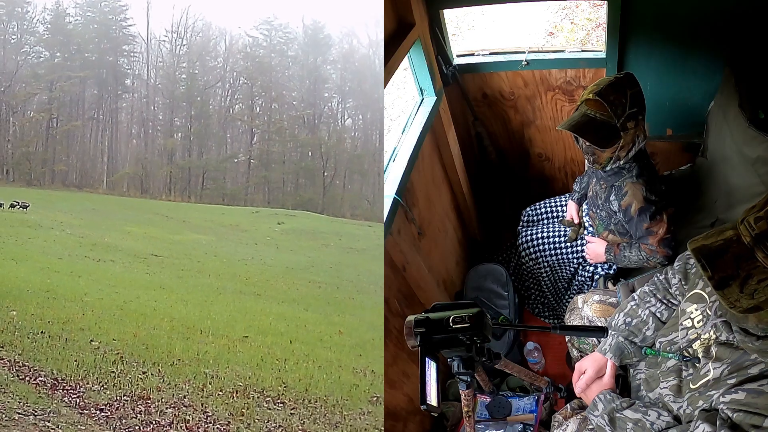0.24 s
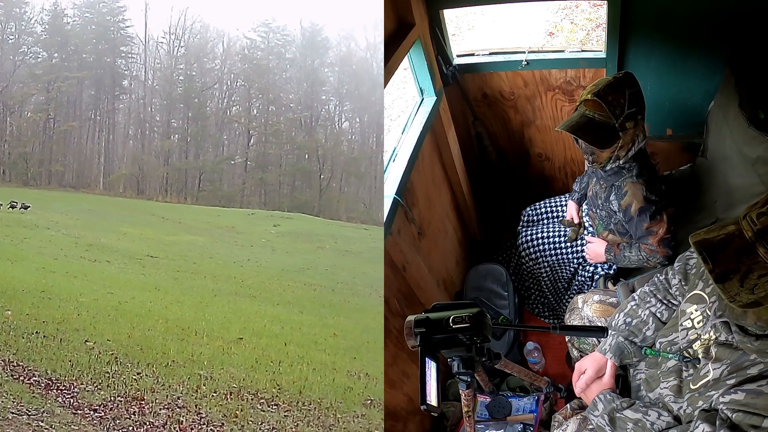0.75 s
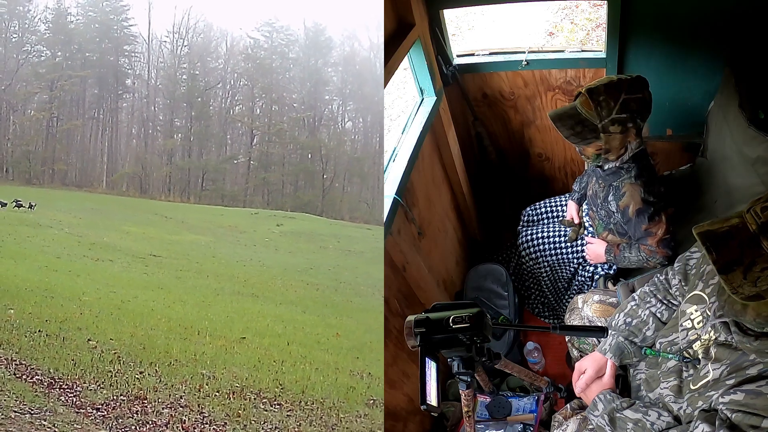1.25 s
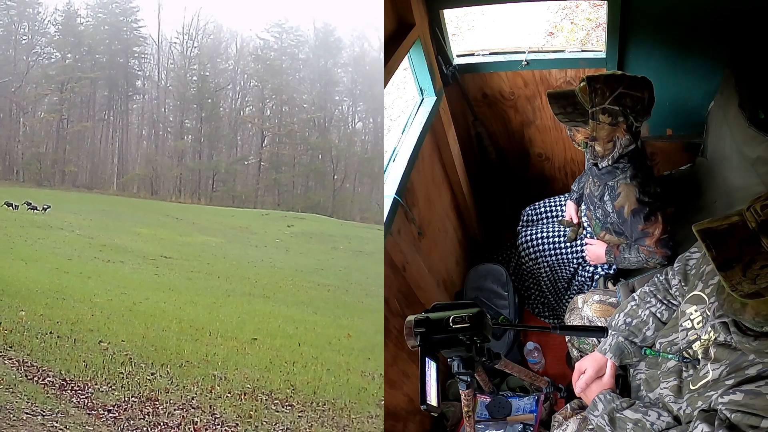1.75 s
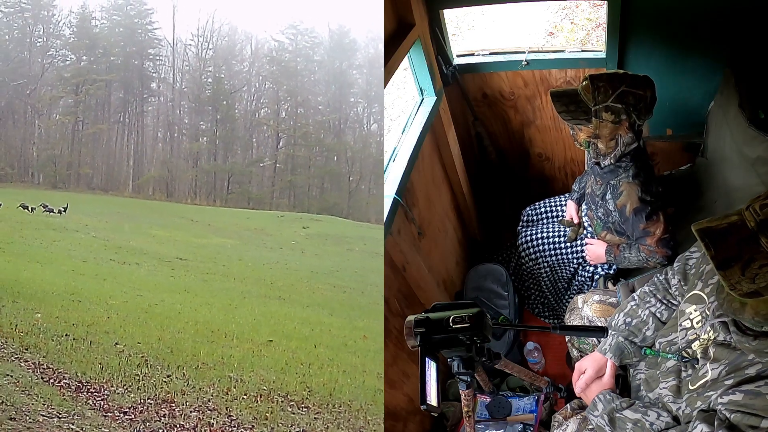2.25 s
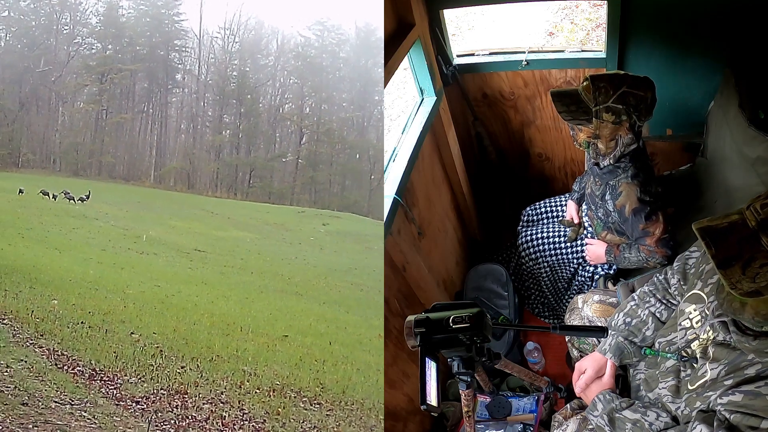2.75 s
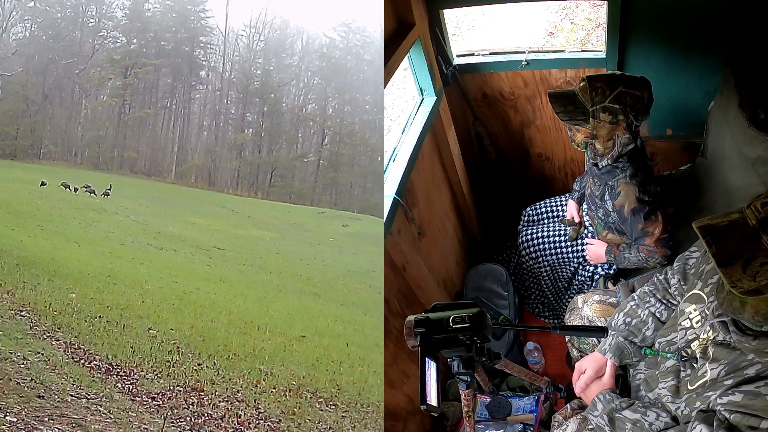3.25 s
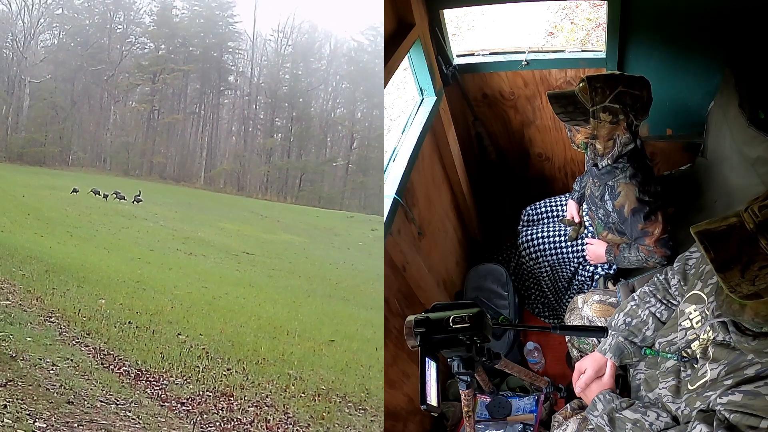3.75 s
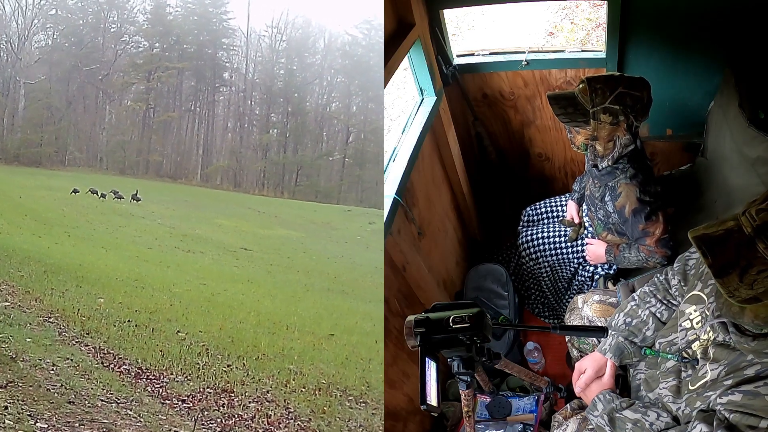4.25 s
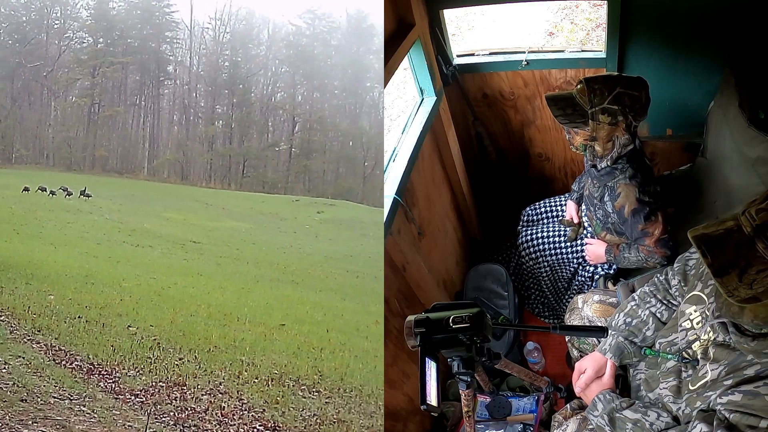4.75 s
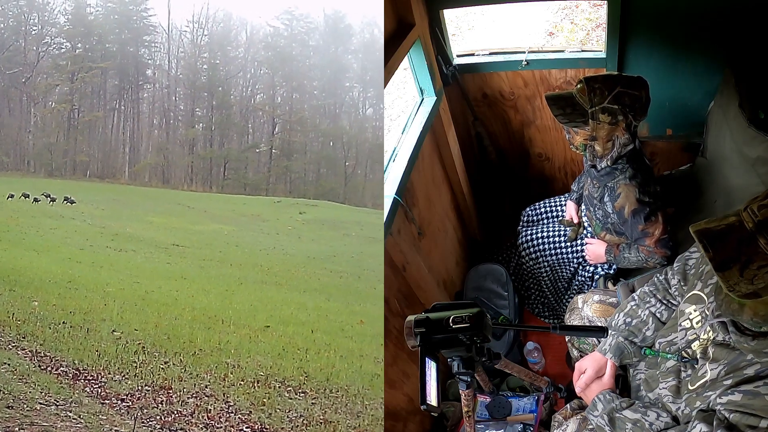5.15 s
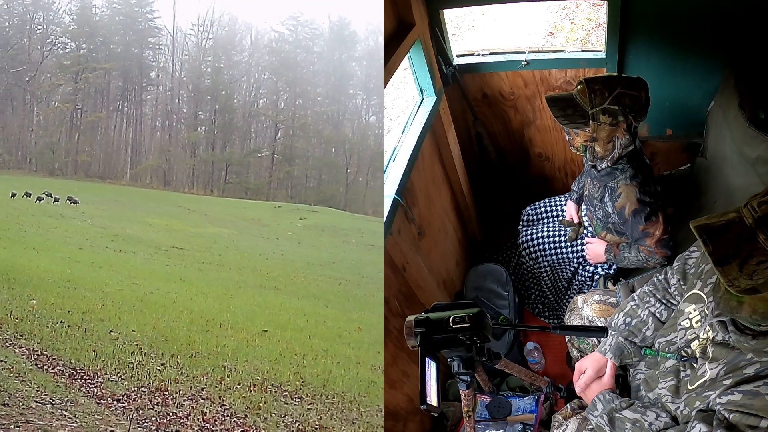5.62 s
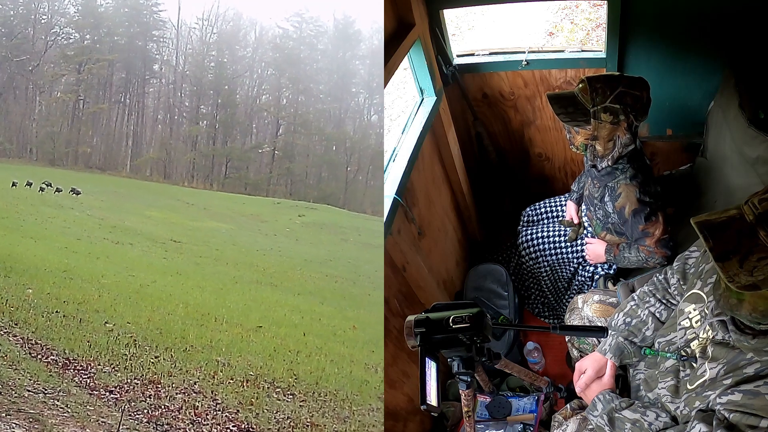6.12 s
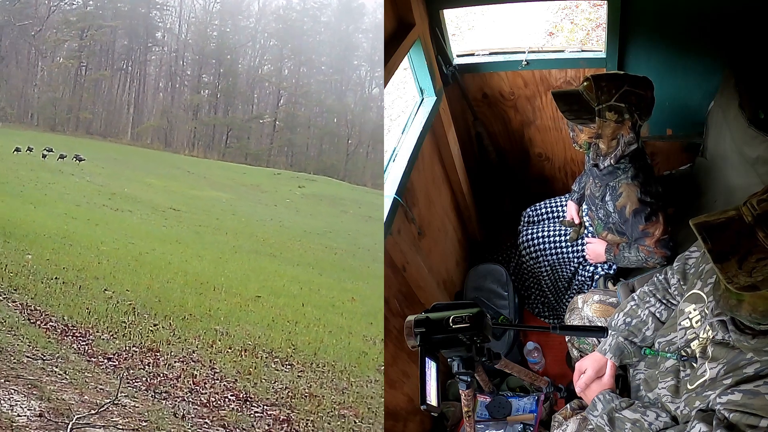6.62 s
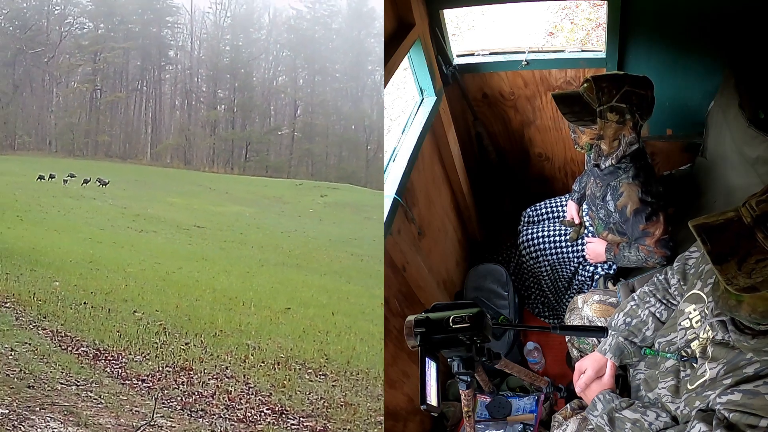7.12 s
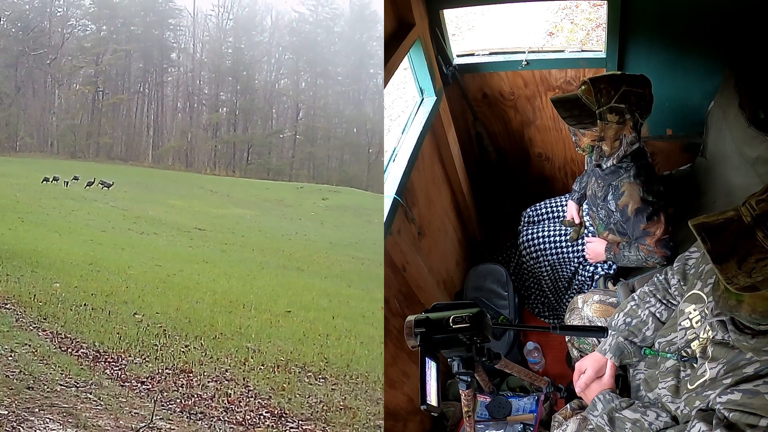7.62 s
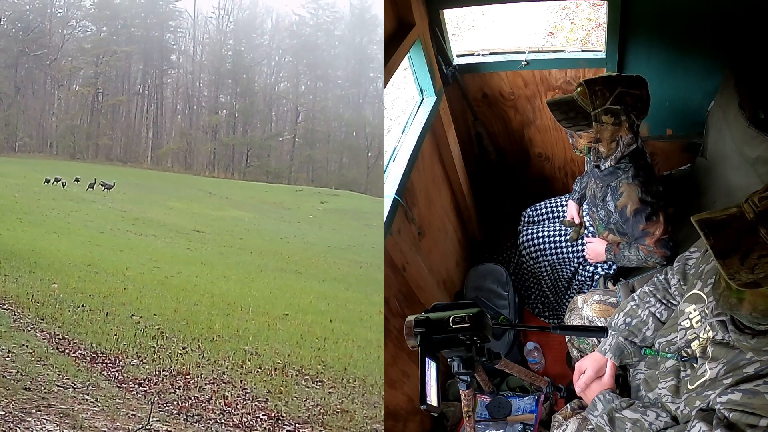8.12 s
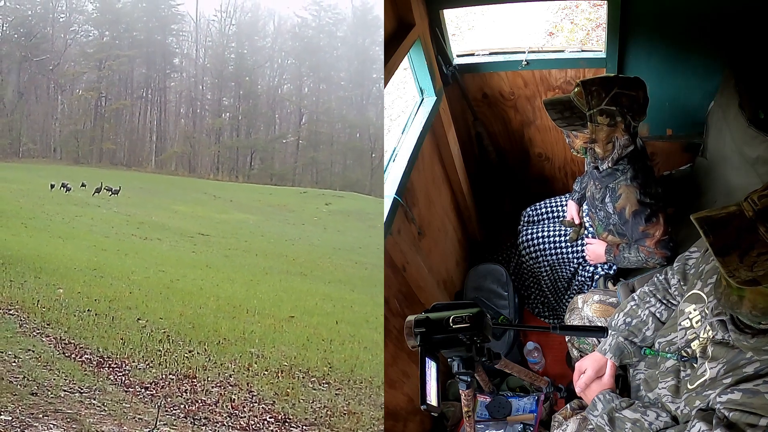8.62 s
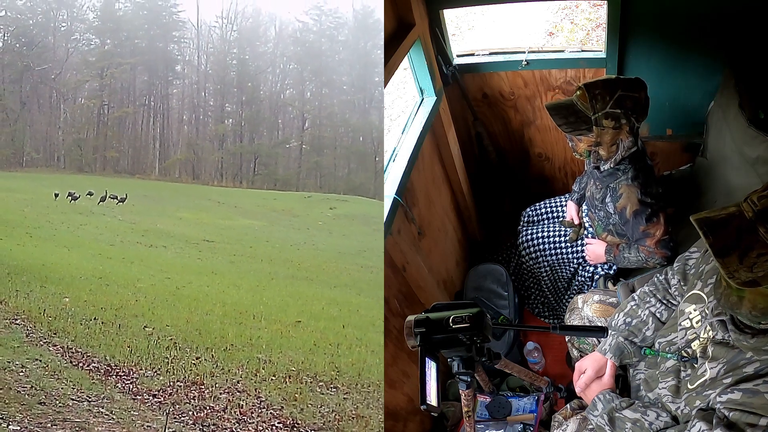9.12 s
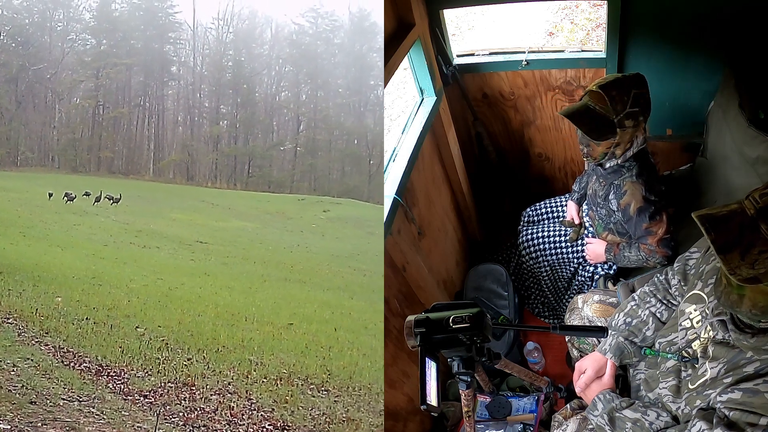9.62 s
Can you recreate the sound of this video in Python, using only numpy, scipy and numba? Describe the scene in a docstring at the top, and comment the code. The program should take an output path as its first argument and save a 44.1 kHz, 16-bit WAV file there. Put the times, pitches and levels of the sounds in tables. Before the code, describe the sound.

Light raindrops tap irregularly on a small wooden hut's roof, heard from inside over a faint hiss of rain and low wind.

```python
"""A low rumble of wind and the hiss of light rain on a field, heard from inside a small hut.
Small drops patter at random on the plywood roof, and fine spray ticks at the windows.
Each big drop cracks on the roof sheet, rattles briefly round the hut and sets the panels booming,
the low notes swelling last. A two-sided microphone hears a slightly different mix left and right."""
import sys
import numpy as np
from scipy import signal
from scipy.io import wavfile
from scipy.ndimage import uniform_filter1d
from numba import njit

SR = 44100
rng = np.random.default_rng(int(sys.argv[2]) if len(sys.argv) > 2 else 0)


def wav_out(sig):
    """Save sig, one row per channel (or a flat mono array), as 16-bit PCM at SR to the path in sys.argv[1]."""
    wavfile.write(sys.argv[1], SR, np.round(np.clip(np.atleast_2d(sig).T, -1, 1) * 32767).astype(np.int16))


N = 435250
WINDOW_LEAN_DB = -1  # a "lean" is the left level minus the right level
OPPOSITE = np.array([[1], [-1]])  # adds on the left, takes away on the right


def undb(db):
    """Turn decibels into a number to multiply by."""
    return 10 ** (np.asarray(db) / 20)


def along(table, hz):
    """Read between rows of pitch and value, with octaves evenly spaced."""
    pitches, values = np.transpose(table)
    return np.interp(np.log(hz), np.log(pitches), values)


@njit
def bandpass(x, hz, width_hz):
    """Let through the sound near hz and weaken the rest."""
    y, band, low = np.empty(len(x)), 0., 0.
    tuning, damping = np.tan(np.pi * hz / SR), width_hz / hz
    for i in range(len(x)):
        now = (band + tuning * (x[i] - low)) / (1 + tuning * (tuning + damping))
        band = 2 * now - band
        low += 2 * tuning * now
        y[i] = damping * now
    return y


def narrow(x, hz, width_hz, passes):
    """Band-pass several times for steeper edges."""
    for _ in range(passes):
        x = bandpass(x, hz, width_hz)
    return x


def wander(per_second):
    """A smooth random curve that strays about 1 either side of zero."""
    hold = int(SR / per_second)
    steps = np.repeat(rng.standard_normal(N // hold + 1), hold)
    return uniform_filter1d(uniform_filter1d(steps, hold), hold)[:N] * np.sqrt(2)


def add(out, start_s, sound, lean_db):
    """Mix a stereo sound into out; a positive lean moves it left."""
    i = int(start_s * SR)
    out[:, i:i + sound.shape[1]] += (sound * undb(OPPOSITE * lean_db / 2))[:, :N - i]


def noise_bands(spectrum, low_hz, high_hz, flicker_db, shared_db, per_second):
    """Noise bands, three to the octave, that flicker alone and together; average (rms) level 1."""
    # Each row: pitch in Hz, how alike left and right are from 0 to 1.
    likeness = [(30, 0.86), (300, 0.31), (1000, 0.86), (3000, 0.33), (8000, 0)]
    # Each row: pitch in Hz, lean to the left in dB.
    leans = [(100, -0.9), (1500, 2), (4000, 4), (8000, -1), (13000, -2)]
    out, shared = 0, wander(per_second)
    for hz in 2 ** np.arange(np.log2(low_hz), np.log2(high_hz), 1 / 3):
        middle, side = (narrow(rng.standard_normal(N), hz, hz / 3, passes=2) for _ in range(2))
        alike = along(likeness, hz)
        pair = np.sqrt(1 + alike) * middle + np.sqrt(1 - alike) * side * OPPOSITE
        steady_db = along(spectrum, hz) + along(leans, hz) / 2 * OPPOSITE
        out = out + pair * undb(steady_db + flicker_db * wander(per_second) + shared_db * shared)
    return out / np.sqrt(np.mean(out ** 2))


def wind_rumble(wind_db):
    """Wind makes a deep noise that swells with each gust."""
    # The tone of the rumble. Each row: pitch in Hz, relative level in dB.
    spectrum = [(12, -17), (20, 6), (30, -2), (48, -2.5), (62, -35), (80, -33)]
    return undb(wind_db) * noise_bands(spectrum, 12, 80, flicker_db=1, shared_db=1.5, per_second=5)


def field_hiss(wind_db, db=-59, db_per_wind_db=0.076):
    """Rain on the field blurs into a hiss, a little louder in gusts."""
    # The tone of the hiss. Each row: pitch in Hz, relative level in dB.
    spectrum = [(41, -30), (70, -11), (103, -10), (177, 6.5), (284, -3.5), (478, -7.5), (785, -29.5),
                (1080, -8), (1380, -5), (1810, -14), (2660, -8.5), (4680, -13), (7690, -18), (12600, -34),
                (15500, -57)]
    gain = undb(db + db_per_wind_db * (wind_db - wind_db.mean()))
    return gain * noise_bands(spectrum, 75, 15500, flicker_db=1.2, shared_db=.4, per_second=20)


def roof_tap(hz, splash_db, crack_db, wood_db=-8, rattle_db=-8, apart=.95):
    """A drop's sharp push cracks near hz, rings the wood, rattles round the hut and splashes."""
    t = np.arange(int(SR / 10)) / SR
    wood_s, rattle_s, splash_s = .05, .095, .06  # 1000 ** (-t / s) fades by 60 dB in s seconds
    noise = rng.standard_normal((5, len(t)))
    sides = apart * noise[3:]  # makes left and right differ
    give = np.clip(1500 / hz, .5, 1)  # stiffer spots crack higher and ring shorter
    push = 3 * np.exp(-t / .0001) + 1.2 * noise[0] * np.exp(-t / .0012)  # the drop spreads as it lands
    crack = bandpass(narrow(push, hz, 2 * hz, passes=3), hz, hz)
    # every spot has its own five short notes, and each side hears its own mix
    detune, left, right = rng.standard_normal((3, 5, 1))
    note_hz = np.maximum(hz * np.exp(.2 * detune + .05), 1120)
    notes = np.sin(2 * np.pi * note_hz * t) * 1000 ** (-t / wood_s / give)
    wood = np.array([((1 + apart * mix) * notes).mean(axis=0) for mix in (left, right)])
    rattle = give * (noise[1] + sides) * (1 - np.exp(-t / .002)) * 1000 ** (-t / rattle_s / give)
    rattle = [narrow(side, 1.15 * hz, 1.3 * hz, passes=2) for side in rattle]
    rattle = np.array([bandpass(side, hz, 2.5 * hz) for side in rattle])
    splash = (noise[2] + sides) * (1 - np.exp(-t / .00029)) * 1000 ** (-t / splash_s)
    splash = np.array([narrow(side, 4400., 4900., passes=3) for side in splash])
    body = undb(crack_db) * crack + undb(wood_db) * wood + undb(rattle_db) * rattle
    return body / np.abs(body).max() + undb(splash_db) * splash / np.abs(splash).max()


def panel_ring(notes, scatter_db=2.5, rise_cycles=0.6, side_db=-14):
    """A struck panel rings; slow bass waves in the wood make its low notes swell late."""
    t = np.arange(int(SR / 4)) / SR
    hz, db, fade_s = np.transpose(notes)[:, :, None]
    louder, detune, phase, lean = rng.standard_normal((4, len(notes), 1))
    damping = np.exp(0.28 * abs(rng.standard_normal(hz.shape)))  # each spot damps differently
    swell = (1 - np.exp(-t * hz / rise_cycles)) * 1000 ** (-t / fade_s * damping)
    waves = np.sin(2 * np.pi * hz * (1 + 0.07 * detune) * t + 2 * phase)
    tones = undb(db + scatter_db * louder) * swell * waves
    middle, side = tones.sum(axis=0), (lean * tones).sum(axis=0)
    return (middle + undb(side_db) * side * OPPOSITE) / np.abs(middle).max()


def panel_boom(wall_db, knock_db, dull_db):
    """Walls boom and the roof knocks; a soft blow loses more of the high notes (dull_db per octave)."""
    # The notes the panels ring at. Each row: pitch in Hz, relative level in dB, longest time
    # in seconds to fade by 60 dB.
    walls = [(74, -4.5, 0.22), (98.4, -9, 0.31), (114.2, -2, 0.2)]
    roof = [(155.9, -8, 0.31), (175.7, 0.5, 0.25), (218, -4.5, 0.25), (266.4, -9.5, 0.23),
            (307, -4.5, 0.17), (359.3, -14.5, 0.2), (386, -7, 0.15), (452, -3, 0.11), (552, -7, 0.09)]
    dull_db += 2.5 * rng.standard_normal()  # each spot gives differently
    dulled_roof = [(hz, db - dull_db * np.log2(hz / roof[0][0]), fade_s) for hz, db, fade_s in roof]
    return undb(wall_db) * panel_ring(walls) + undb(knock_db) * panel_ring(dulled_roof)


def patter(count=700, db=-56, size_db=5, typical_hz=2200):
    """Small drops hit the roof at random moments, each on its own spot; a few are larger."""
    out = np.zeros((2, N))
    when, size, spots = rng.random(count), rng.exponential(size=count), rng.standard_normal((count, 3))
    flurry_db = 1.3 * wander(4)[(when * (N - 1)).astype(int)]  # louder and softer spells
    gains = undb(db + size_db * np.minimum(size, 1.6) + flurry_db)
    for k, (start_s, gain, (spot, wetness, lean)) in enumerate(zip(when * N / SR, gains, spots)):
        hz = np.clip(typical_hz * np.exp(0.39 * spot), 1000., 4200.)
        tap = roof_tap(hz, splash_db=-14 + 5 * wetness, crack_db=-13)
        add(out, start_s, gain * tap, lean_db=3 + 6 * lean)
        if k % 8 == 0:  # one in eight lands where the panels give
            boom = panel_boom(wall_db=-8 + 4 * spot, knock_db=-4, dull_db=6.5)
            add(out, start_s, gain * boom, lean_db=1.5)
    return out


def splash_tick(hz, cycles=22, base_fade_s=.008):
    """A tiny splash is a puff of noise near hz, longer the lower it is."""
    t = np.arange(int(SR / 40)) / SR
    noise = rng.standard_normal((3, len(t)))
    shape = (1 - np.exp(-t / .001)) * 1000 ** (-t / (base_fade_s + cycles / hz))
    puff = (noise[0] / 2 + noise[1:]) * shape
    sound = np.array([bandpass(narrow(side, hz, hz, passes=2), hz, 2 * hz) for side in puff])
    return sound / np.abs(sound).max()


def window_spray(wind_db, count=900, db=-63, size_db=3, typical_hz=5500, db_per_wind_db=0.37):
    """Fine splashes hit the windows in flurries, harder when the wind rises."""
    out = np.zeros((2, N))
    flurry_db = 4 * wander(2.89) + db_per_wind_db * (wind_db - wind_db.mean())
    splashes = np.c_[rng.random(count), rng.exponential(size=count), rng.standard_normal((count, 2))]
    for when, size, fineness, lean in splashes:
        gain = undb(db + size_db * (min(size, 2) - fineness) + flurry_db[int(when * (N - 1))])
        hz = np.clip(typical_hz * np.exp(0.25 * fineness), 2500., 9000.)
        add(out, when * N / SR, gain * splash_tick(hz), WINDOW_LEAN_DB + 4 * lean)
    return out


def big_drops(boom_lean_db=2.5):
    """The drops that stand out crack, thud or splash on the hut; most land to the left."""
    # Hard hits on the roof. Each row: start in seconds, tap level in dB, pitch in Hz,
    # splash in dB above the tap, roof knock in dB, wall boom in dB above the knock.
    drops = [(0.3039, -32, 1226, -36, -35.5, -12.5), (0.447, -23.5, 1537, -46, -32, -2),
             (0.9471, -37, 1400, -13, -44, -2.5), (1.291, -31.5, 1613, -11, -40.5, -4),
             (1.5375, -24, 2070, -3, -30.5, -12.5), (1.6426, -20, 1530, -50, -28.5, -15),
             (1.6926, -45, 1350, -26, -42, -8), (1.7858, -31.5, 1343, -9.5, -37, -27),
             (1.8213, -37, 2330, -14, -48, -13), (1.838, -39, 2860, -3, -60, -4),
             (2.2924, -27, 1860, -48, -37, -1), (2.696, -39, 2500, -15, -69, -2),
             (2.766, -32, 1227, -38, -38, -11.5), (2.86, -39.5, 1730, -15, -38.5, -19),
             (3.0858, -38.5, 1570, -15, -58.5, -15), (3.3669, -33.5, 2160, -5, -45, -7),
             (3.397, -33.5, 1370, -13, -42.5, -15), (3.419, -34, 1490, -17, -57, 11),
             (3.845, -37.5, 1180, -8.5, -41, -7), (3.9197, -36.5, 1840, -28, -54, -18),
             (4.3029, -31.5, 1100, -17, -40, -6.5), (4.575, -35, 1640, -13, -77, -10),
             (4.8816, -36, 1330, -29, -50.5, 0), (5.1599, -25.5, 2380, -76, -37.5, -6.5),
             (5.467, -37.5, 1420, -5, -51, -7), (5.656, -35.5, 2800, -20, -49, -14),
             (5.7329, -32, 1374, -21, -36, 2), (6.1656, -24.5, 1427, -44, -36.5, -9),
             (6.2592, -33, 1610, -10, -50, -1), (6.317, -35, 1780, -19, -45, -23),
             (7.3215, -39.5, 1760, -25, -67, -1), (7.465, -32, 1990, -12, -41, -34),
             (7.6177, -34.5, 1280, -15, -39.5, -8.5), (7.6725, -35.5, 1187, -18, -37, -14),
             (7.8964, -39, 1520, -10, -49, -2), (7.962, -28, 1680, -13, -31.5, -28),
             (8.1614, -31.5, 1094, -23, -30, -5.5), (8.4602, -29, 1140, -39, -34, 6),
             (8.4897, -35.5, 1370, -15, -39, -7), (8.636, -26, 1420, -46, -43, -0.5),
             (8.8949, -38, 2580, -34, -58, 1), (9.157, -38.5, 1410, -30, -43.5, -9),
             (9.2546, -39.5, 1450, -10, -51, -4), (9.3714, -33.5, 1190, -15, -29.5, -6),
             (9.83, -36.5, 1630, -13, -42, -7)]
    # Soft hits with no crack. Each row: start in seconds, roof knock in dB, wall boom in dB above it.
    thuds = [(1.347, -40.5, -10), (1.919, -45.5, -6), (2.279, -40, -6), (2.579, -44, -13),
             (3.76, -35.5, -1), (4.384, -44, 9.5), (4.679, -34.5, -9.5), (6.365, -43.5, -3),
             (7.209, -44.5, -27), (7.577, -42.5, -30), (7.93, -36, -39), (8.009, -37.5, -4)]
    # Thin splashes on sills and walls. Each row: start in seconds, level in dB, pitch in Hz.
    ticks = [(0.656, -42, 2560), (0.98, -44, 1200), (3.365, -45, 8650), (3.842, -43, 8550),
             (4.829, -43, 4470), (5.194, -44, 7350), (5.344, -42, 2300), (5.444, -41, 2490),
             (5.851, -42, 2110), (6.299, -40.5, 3640), (6.888, -42.5, 1340), (7.058, -42, 2730),
             (7.12, -43, 4000), (7.288, -49, 8900), (7.369, -37.5, 7900), (7.99, -42, 1490),
             (8.003, -38.5, 1260), (9.255, -47, 7700)]
    out = np.zeros((2, N))
    leans_db = rng.normal(4, 1.5, len(drops))
    for (start_s, db, hz, splash_db, knock_db, above_db), lean_db in zip(drops, leans_db):
        crack_db = -6 + .45 * (db + 24)  # lighter drops splat rather than crack
        add(out, start_s, undb(db) * roof_tap(float(hz), splash_db, crack_db), lean_db)
        add(out, start_s, panel_boom(knock_db + above_db, knock_db, dull_db=-0.5), boom_lean_db)
    for start_s, knock_db, above_db in thuds:
        add(out, start_s, panel_boom(knock_db + above_db, knock_db, dull_db=5.5), boom_lean_db)
    for start_s, db, hz in ticks:
        add(out, start_s, undb(db) * splash_tick(float(hz)), WINDOW_LEAN_DB)
    return out


def scene():
    """Wind and steady rain outside, with drops landing on the hut."""
    # How the wind rises and falls. Each row: time in seconds, rumble level in dB.
    gusts = [(0, -55.5), (.9, -59.5), (1.9, -54.5), (2.15, -51.5), (3.2, -56.5), (5.1, -54.5),
             (6.75, -52.5), (6.95, -42.5), (8.15, -51.5), (9.2, -54.5), (9.87, -61)]
    wind_db = np.interp(np.arange(N) / SR, *np.transpose(gusts))
    return wind_rumble(wind_db) + field_hiss(wind_db) + big_drops() + patter() + window_spray(wind_db)


def record(dry, dull_hz=12500, top_hz=15700):
    """The microphone dulls the high treble, then a steep filter cuts off the very top."""
    dulled = signal.sosfilt(signal.butter(2, dull_hz, fs=SR, output="sos"), dry)
    return signal.sosfilt(signal.ellip(8, .2, 70, top_hz, fs=SR, output="sos"), dulled)


dry = scene()
out = record(dry)
wav_out(out)
```